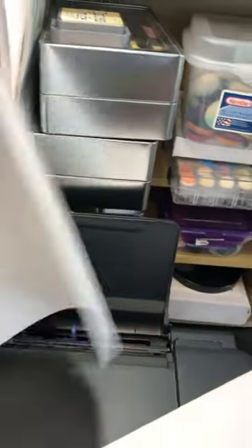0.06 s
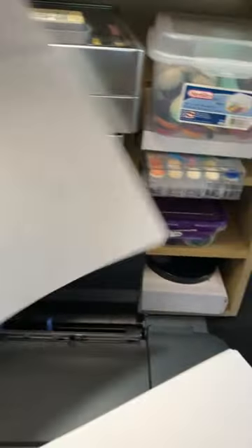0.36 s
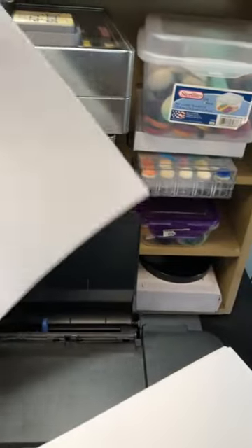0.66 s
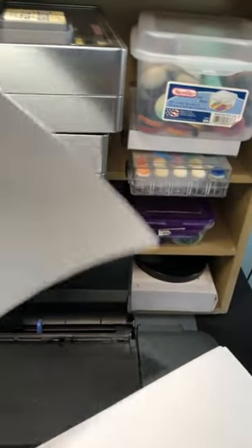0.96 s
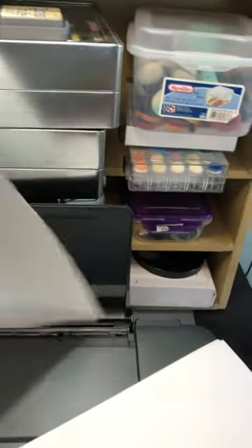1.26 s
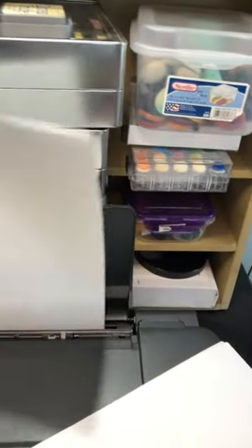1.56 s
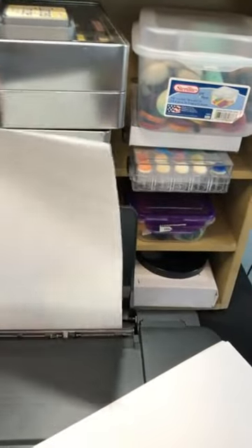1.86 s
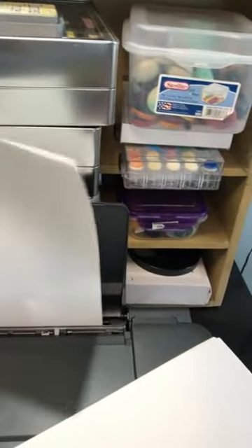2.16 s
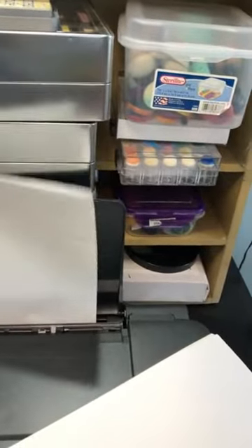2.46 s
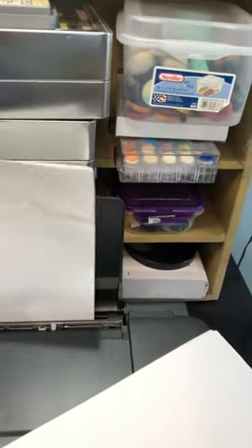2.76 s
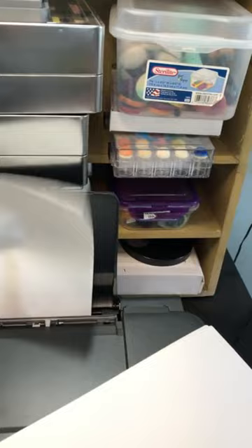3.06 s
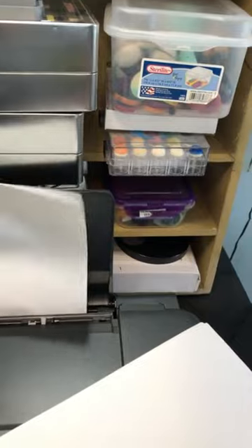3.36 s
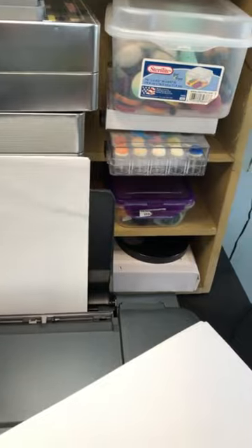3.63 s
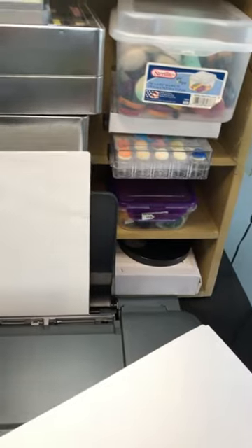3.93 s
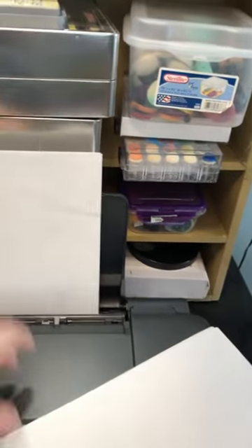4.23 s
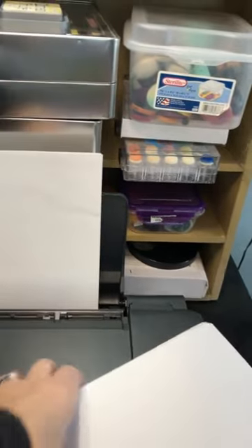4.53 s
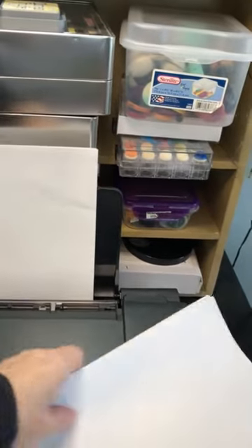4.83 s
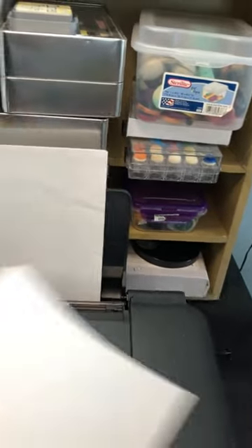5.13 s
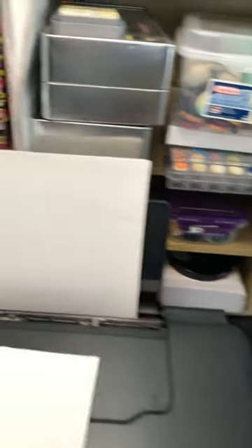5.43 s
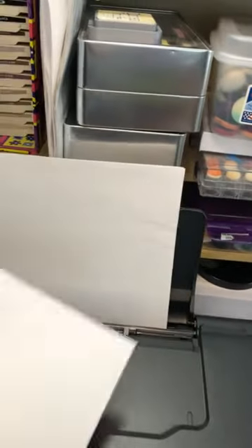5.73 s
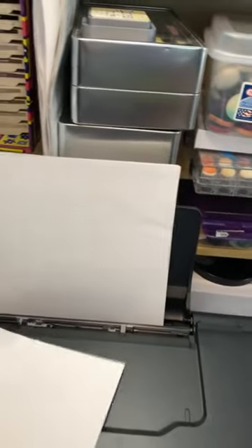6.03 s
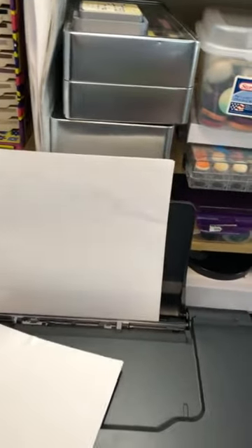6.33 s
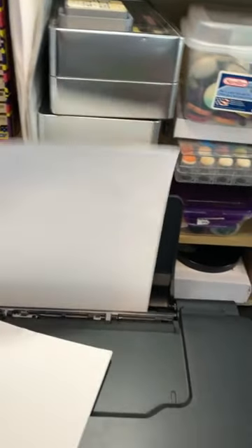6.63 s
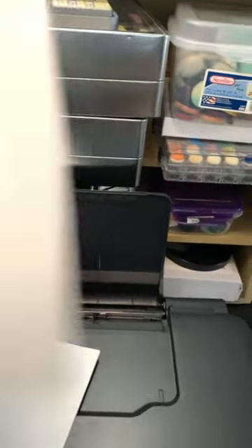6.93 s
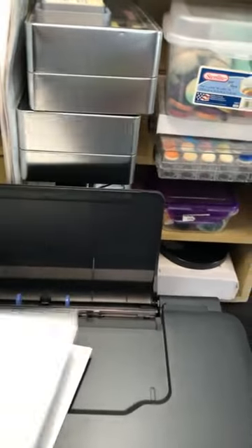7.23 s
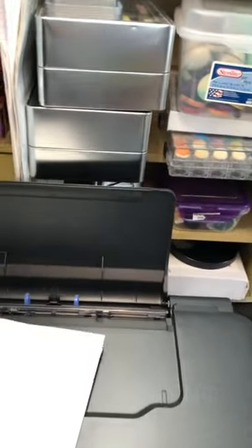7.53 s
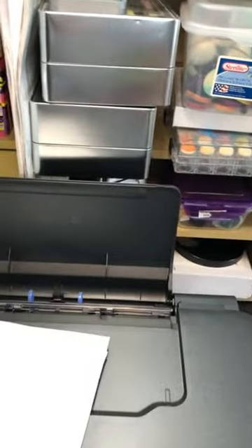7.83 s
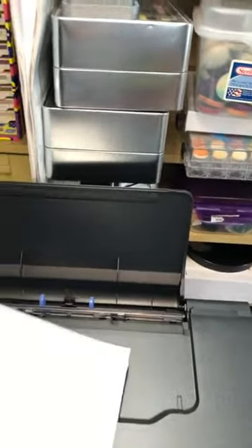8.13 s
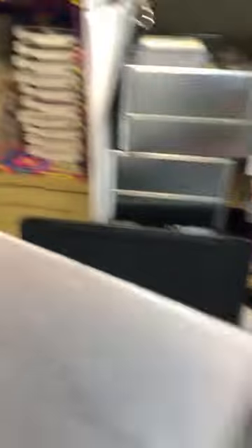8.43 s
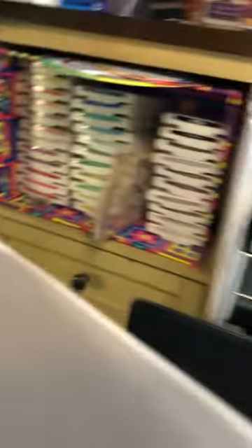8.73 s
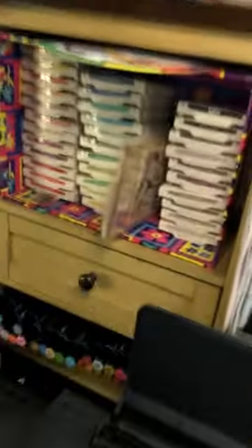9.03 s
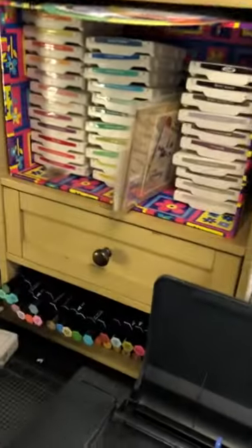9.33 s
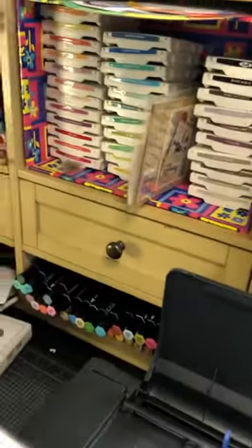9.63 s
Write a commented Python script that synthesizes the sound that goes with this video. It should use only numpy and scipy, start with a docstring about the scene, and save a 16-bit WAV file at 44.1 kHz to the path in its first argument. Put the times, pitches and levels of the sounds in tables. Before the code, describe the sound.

A sheet of paper flaps, rustles and buckles as its edges are tapped into a printer's plastic feed slot. A hand drags another sheet over the hollow lid, and paper swishes across paper. The first sheet is pulled out with a brief rough squeak. More snaps, scuffs and glides follow, ending with two drags and a soft handling rumble on the microphone. The sound is close, in a small room with a faint hum.

```python
"""Paper at the rear feed slot of an inkjet printer, close up in a small furnished room with a faint hum.
A sheet flaps, rustles and buckles, and its edges are tapped into the ringing plastic slot.
From 4.2 s a hand drags another sheet over the hollow lid, then paper swishes across paper.
At 6.6 s the first sheet is pulled out with a stick-slip squeak. More snaps, scuffs and glides follow,
and two last drags close the scene, with a soft rumble of the hand on the microphone."""
import sys
import numpy as np
from scipy import signal
from scipy.fft import rfft, irfft, next_fast_len
from scipy.io import wavfile
from scipy.ndimage import uniform_filter1d

SR = 44100
rng = np.random.default_rng(int(sys.argv[2]) if len(sys.argv) > 2 else 0)


def materialize(psi):
    """Save the field psi as 16-bit PCM at rate SR to the path in sys.argv[1].

    A 1-D psi becomes a single channel; in a 2-D psi each row is a channel.
    """
    bounded = np.clip(np.atleast_2d(psi).T, -1, 1)
    quanta = np.round(bounded * 32767).astype(np.int16)
    wavfile.write(sys.argv[1], SR, quanta)


N = 427329

# modes of the plastic feed tray: f/Hz, width/Hz, level/dB
TRAY_MODES = [(399, 530, -13.5), (1290, 260, 1), (1650, 100, -7.5), (2090, 160, -15), (3190, 330, -8),
              (4570, 1200, -4.5)]
CASE_HZ, CASE_WIDTH_HZ = 1530, 310   # the printer's hollow case sings along with rubbing


def from_db(db):
    """Decibels to gain."""
    return 10 ** (np.asarray(db) / 20)


def rms_one(x):
    """Scale to rms 1."""
    return x / np.sqrt(np.mean(x ** 2) + 1e-20)


def energy_one(x):
    """Scale to energy 1."""
    return x / np.sqrt(np.sum(x ** 2) + 1e-20)


def evened(x, size=1800):
    """Ride the level to rms 1 over `size` samples, keeping the grain."""
    return x / np.sqrt(uniform_filter1d(x ** 2, size) + 1e-9)


def envelope(points):
    """Gain at every sample from breakpoints of t/s, level/dB."""
    times, levels_db = np.transpose(points)
    return from_db(np.interp(np.arange(N) / SR, times, levels_db))


def drift(rate_hz):
    """Random wander with rms 1."""
    knots = rng.standard_normal(N // 20)
    return rms_one(np.interp(np.arange(N) / SR * rate_hz, np.arange(len(knots)), knots))


def band(x, low_hz, high_hz, order=2):
    """Causal band-pass."""
    top = min(high_hz, SR / 2 - 100)
    sos = signal.butter(order, [min(low_hz, top / 2), top], "band", fs=SR, output="sos")
    return signal.sosfilt(sos, x + 1e-18)


def resonator(hz, width_hz):
    """Filter coefficients of one resonance with gain 1 at its peak."""
    r = np.exp(-np.pi * width_hz / SR)
    return np.array([1, 0, -1]) * (1 - r * r) / 2, [1, -2 * r * np.cos(2 * np.pi * hz / SR), r * r]


def resonate(x, hz, width_hz):
    """Ring a fixed resonance."""
    return signal.lfilter(*resonator(hz, width_hz), x + 1e-18)


def sweep(x, hz, block=128):
    """Ring a moving resonance as wide as its centre frequency."""
    out, state = np.zeros(len(x)), np.zeros(2)
    for i in range(0, len(x), block):
        out[i:i + block], state = signal.lfilter(*resonator(hz[i], hz[i]), x[i:i + block], zi=state)
    return out


def colour(x, eq):
    """Shape a steady excitation with an EQ curve; rms 1."""
    size = next_fast_len(N)
    hz, db = np.transpose(eq)
    bins_hz = np.maximum(np.arange(size // 2 + 1) * SR / size, 1)
    gain = from_db(np.interp(np.log(bins_hz), np.log(hz), db, left=-60))
    return rms_one(irfft(rfft(x, size) * gain, size)[:N])


def grains(per_s, spread_db, smooth):
    """Tiny slips of uneven size on top of smooth friction noise."""
    sizes = from_db(spread_db * np.minimum(rng.exponential(1, N), 4)) * rng.choice([-1, 1], N)
    slips = rms_one(sizes * (rng.random(N) < per_s / SR))
    return slips + smooth * rng.standard_normal(N)


def tray(x, ring):
    """A contact heard directly and through the modes of the tray."""
    return x + ring * sum(from_db(db) * resonate(x, hz, width) for hz, width, db in TRAY_MODES)


def room_tone(noise_db=-66):
    """The bed: a faint, slightly wavering hum in dull room noise."""
    # hum tone: f/Hz, rms level/dB
    hum_tones = [(145.3, -72)]
    # EQ of the room noise: f/Hz, level/dB
    room_eq = [(25, -20), (65, 13), (150, 3), (550, 1), (1150, -8.5), (2200, -39), (4500, -21),
               (16000, -32)]
    t = np.arange(N) / SR
    hum = sum(np.sqrt(2) * from_db(db) * np.sin(2 * np.pi * hz * t + 0.49 * drift(42))
              for hz, db in hum_tones)
    return hum + from_db(noise_db) * colour(rng.standard_normal(N), room_eq)


def stroke_gains(fade_db=16, roundness=2.63, linger_s=0.032):
    """Each stroke swells and fades with the speed of the sheet: gains of friction, hiss and bending."""
    # sheet movements: fastest t/s, rise/s, fall/s, friction/dB, hiss/dB and bend/dB (both re friction)
    strokes = [(0.03, 0.1, 0.043, -59.5, -5.5, 2), (0.21, 0.17, 0.17, -53, -4, 8),
               (0.447, 0.055, 0.036, -48.5, -4.5, -4.5), (1.25, 0.11, 0.14, -61.5, 0.5, -17),
               (1.37, 0.054, 0.086, -48, -16, -2.5), (1.48, 0.079, 0.028, -57, -1.5, -16),
               (1.65, 0.057, 0.097, -57, -3.5, -22), (1.75, 0.017, 0.089, -40.5, -15, -6),
               (1.90, 0.19, 0.15, -59.5, -3, 4.5), (2.05, 0.061, 0.18, -53, -7, -9.5),
               (2.41, 0.25, 0.24, -49, -7.5, -5.5), (2.66, 0.04, 0.054, -49, -9.5, -2),
               (2.82, 0.067, 0.059, -49.5, -9.5, -6.5), (2.94, 0.078, 0.044, -51.5, -9, 1.5),
               (3.091, 0.076, 0.056, -50.5, -4, 1), (3.239, 0.054, 0.041, -42, -5.5, -3),
               (3.304, 0.014, 0.06, -46, -4, 0), (3.51, 0.087, 0.038, -54.5, -8, -1),
               (3.74, 0.11, 0.12, -57, -8, 2.5), (3.92, 0.22, 0.13, -66, 3, 5.5),
               (4.30, 0.067, 0.76, -49, -12.5, -5.5), (4.60, 0.059, 0.041, -42, -8.5, -9.5),
               (4.79, 0.1, 0.11, -58.5, 2, -6), (5.76, 0.045, 0.08, -54.5, -6.5, 0.5),
               (6.031, 0.22, 0.048, -60, 3.5, 4.5), (6.118, 0.0083, 0.023, -53, -23, 2),
               (6.441, 0.069, 0.18, -50.5, -7.5, 4.5), (6.64, 0.12, 0.18, -45.5, -13, 0),
               (7.05, 0.18, 0.22, -57.5, 0, -13), (7.36, 0.12, 0.078, -60, 8, 2),
               (7.66, 0.14, 0.21, -54.5, -11, -1), (7.66, 0.037, 0.015, -37, -13, -15),
               (8.089, 0.083, 0.086, -59.5, 6, -15), (8.82, 0.032, 0.1, -58.5, 13.5, -8),
               (9.04, 0.12, 0.15, -56.5, -9, 8), (9.34, 0.11, 0.061, -51.5, -4, 3.5),
               (9.587, 0.072, 0.13, -48.5, -3.5, -2.5)]
    t = np.arange(0, N + 32, 32) / SR
    power = from_db([[-72.5], [-80.5], [-68.5]]) ** 2   # a held sheet is never quite still

    def fade(peak, rise, fall):
        """Drop in dB either side of the fastest moment."""
        distance = np.maximum((peak - t) / rise, (t - peak) / fall)
        return fade_db * np.clip(distance, 0, 5) ** roundness

    for peak, rise, fall, friction_db, hiss_db, bend_db in strokes:
        rub_db = friction_db - fade(peak, rise, fall)
        wobble_db = friction_db - fade(peak, rise, fall + linger_s)   # the wobble outlasts the rub
        power = power + from_db([rub_db, rub_db + hiss_db, wobble_db + bend_db]) ** 2
    return [np.interp(np.arange(N) / SR, t, np.sqrt(p)) for p in power]


def rustle(friction, hiss, shift_db=16.0, catch_db=6.0, crackle_db=-9, crinkle_db=-11, case_db=-14):
    """Fibres catch and let go: coarse slips sound the tray and case, fine ones merge into soft hiss."""
    # EQ of the coarse rub: f/Hz, level/dB
    friction_eq = [(400, -13.5), (700, 3), (1400, 4), (2300, 0.5), (4200, -8.5), (6000, -13), (12000, -37)]
    # EQ of the fine hiss: f/Hz, level/dB
    hiss_eq = [(2000, -3), (3500, 0.5), (4800, -2), (8000, -6.5), (16000, -6)]
    slips = grains(2200, spread_db=4.0, smooth=0.93)
    # the resonances swell and fade as the bend of the sheet changes
    modes = sum(from_db(db + shift_db * drift(16)) * resonate(slips, hz, 2 * width)
                for hz, width, db in TRAY_MODES)
    coarse = from_db(catch_db * drift(70) - 2.05) * evened(colour(slips + 0.18 * modes, friction_eq))
    # each half octave of the hiss wanders on its own
    edges_hz = 2000 * 2 ** (np.arange(7) / 2)
    shimmer = sum(from_db(4.5 * drift(8.4)) * band(rng.standard_normal(N), low, high)
                  for low, high in zip(edges_hz, edges_hz[1:]))
    crackles = from_db(crackle_db) * grains(740, spread_db=8.0, smooth=0)
    fine = from_db(2.3 * drift(60)) * colour(evened(shimmer) + crackles, hiss_eq)
    case = resonate(rng.standard_normal(N), CASE_HZ, CASE_WIDTH_HZ)
    case = from_db(case_db) * rms_one(band(case, CASE_HZ / 2, 2 * CASE_HZ))
    # small creases ring low and round
    creases = grains(110, spread_db=1.2, smooth=0)
    crinkles = from_db(crinkle_db) * rms_one(band(tray(creases, ring=1.2), 640, 5600))
    return friction * (coarse + crinkles) + hiss * fine + np.hypot(friction, hiss) * case


def flexing(bend):
    """The sheet bends in many soft, low buckles."""
    # EQ of the buckling: f/Hz, level/dB
    flex_eq = [(30, -22.5), (95, -11.5), (160, 0), (330, 0.5), (650, -10.5), (1100, -42.5)]
    buckles = grains(700, spread_db=3.0, smooth=0.67)
    return bend * evened(colour(buckles, flex_eq), size=2000)


def scuffs():
    """A bowed sheet brushes past something: a swell of slips rings its hollow."""
    # hollow scuffs: middle t/s, level/dB, ring f/Hz, half length/s
    brushes = [(0.116, -45.5, 1210, 0.017), (0.163, -38, 264, 0.015), (0.248, -44.5, 960, 0.046),
               (0.307, -36.5, 270, 0.01), (5.003, -51, 1420, 0.044), (5.298, -48, 490, 0.017),
               (6.043, -45.5, 1460, 0.018), (6.949, -38, 380, 0.0027), (7.071, -45.5, 960, 0.0053),
               (7.151, -48, 2730, 0.0053), (7.413, -49, 1840, 0.011), (7.66, -37.5, 1320, 0.028),
               (7.836, -47, 860, 0.028), (8.033, -41.5, 650, 0.0025), (8.293, -41, 254, 0.0052),
               (8.888, -37.5, 630, 0.0085), (9.04, -48.5, 895, 0.044)]
    t, out = np.arange(N) / SR, np.zeros(N)
    slips = grains(1800, spread_db=1.5, smooth=1.0)
    for middle, level_db, ring_hz, half_s in brushes:
        near = np.abs(t - middle) < .5
        swell = 1 / np.cosh(np.minimum(np.abs(t[near] - middle) / half_s * np.pi / 2, 20))
        hollow = band(resonate(slips[near], ring_hz, 0.55 * ring_hz), ring_hz / 2, 2 * ring_hz)
        out[near] += from_db(level_db) * swell * evened(hollow, size=900)
    return out


def snap(ring_hz, contact_s, crack_db, thump_db, scrape_s=0.0011, thump_s=0.011):
    """A sudden contact with a short scrape: the paper rings, cracks on top, and the whole sheet thumps."""
    t = np.arange(SR // 8) / SR
    contact_s = max(contact_s, 1 / 4000)
    noise = rng.standard_normal((3, len(t)))
    scrape = energy_one(noise[0] * np.abs(noise[2]) * np.sqrt(t) * np.exp(-t / contact_s))
    # brief contacts are one clean click, long ones mostly a run of tiny slips
    contact = (t == 0) + contact_s / scrape_s * scrape
    # soft pops ring in a narrow band, crisp creases in a wide one
    body = resonate(tray(contact, ring=0.74), ring_hz, from_db(0.28 * crack_db) * ring_hz)
    note = 0.36 * resonate(body, ring_hz, ring_hz / 9)
    ring = energy_one(band(body + note, 0.33 * ring_hz, 2.0 * ring_hz, order=3))
    bright = contact + 2 * resonate(contact, 2.99 * ring_hz, 1300)
    crack = energy_one(band(bright, 2800, 23000))
    push = evened(noise[1], size=200) * np.sqrt(t) * np.exp(-t / thump_s)
    thump = energy_one(band(push, 165, 644))
    return ring + from_db(crack_db) * crack + from_db(thump_db) * thump


def snaps(lift_db=4.0):
    """Edges tap plastic and creases snap through; slow, low snaps move the sheet most and thump hardest."""
    # taps and snaps: t/s, level/dB before the lift, ring f/Hz, contact/s, crack/dB re level
    hits = [(0.189, -46.5, 2160, 0.0045, 1.5), (0.234, -46, 2240, 0.0072, -9),
            (0.35, -56, 1380, 0.0021, -4), (0.387, -50.5, 3530, 0.0023, -7),
            (0.416, -45.5, 4330, 0.0024, -16), (0.456, -48.5, 3050, 0.0019, -5),
            (0.59, -59.5, 2330, 0.0031, -7), (0.866, -73, 3030, 0.0014, -16), (1.055, -67, 4400, 0.01, -3),
            (1.113, -59, 1550, 0.0016, -10), (1.219, -55, 3100, 0.0022, -15),
            (1.251, -41.5, 1390, 0.0033, -3), (1.337, -46, 1090, 0.0067, -11),
            (1.392, -50, 2520, 0.0048, -5), (1.508, -44, 2760, 0.0018, 1), (1.698, -44, 1430, 0.00087, -74),
            (1.72, -40, 1810, 0.007, -0.5), (1.745, -42, 1940, 0.0013, 1.5),
            (1.794, -49.5, 3020, 0.00081, -5), (1.852, -46.5, 2220, 0.0039, -4.5),
            (2.173, -45.5, 2900, 0.0047, -4.5), (2.453, -38.5, 2070, 0.0021, -20.5),
            (2.631, -47, 1950, 0.0042, -22), (2.818, -44.5, 1660, 0.0017, -52),
            (2.862, -36, 1920, 0.0017, -25), (2.876, -47, 3400, 0.0016, -10),
            (3.091, -38.5, 1800, 0.0052, -40), (3.228, -39.5, 1540, 0.0026, -15),
            (3.287, -28, 2590, 0.0016, 0.5), (3.446, -51, 1550, 0.0039, -13),
            (3.496, -39.5, 1820, 0.0084, -17), (3.744, -47, 1850, 0.0045, -13),
            (3.827, -45, 3000, 0.00061, -38), (4.118, -62, 2220, 0.0088, -7),
            (4.228, -39, 1880, 0.0052, -7), (4.239, -40.5, 1160, 0.0069, -8),
            (4.424, -43.5, 2180, 0.0023, -8), (4.471, -45.5, 1440, 0.0023, -8.5),
            (4.525, -50.5, 1730, 0.0058, -4.5), (4.571, -47.5, 1564, 0.0064, -11),
            (4.703, -26.5, 1665, 0.00014, -56), (4.851, -54, 1320, 0.00057, -44.5),
            (5.667, -48, 830, 0.0018, -51), (5.77, -41, 1040, 0.0014, -61),
            (6.095, -54.5, 1670, 0.0041, -12), (6.423, -40.5, 2040, 0.0075, -11.5),
            (6.566, -45.5, 1720, 0.0074, -5), (6.587, -40.5, 2250, 0.012, -7.5),
            (6.686, -44.5, 2580, 0.0021, 4.5), (6.695, -43, 1050, 0.0011, -28),
            (6.922, -43, 2770, 0.0013, -7), (6.949, -50, 3180, 0.0006, 5.5),
            (6.970, -43, 2140, 0.00075, -31), (6.979, -44.5, 2670, 0.00067, -73),
            (7.264, -52.5, 1090, 0.0054, 0), (7.276, -36, 2470, 0.00082, -18),
            (7.279, -33, 3000, 0.00086, -14.5), (7.484, -55, 1230, 0.0032, -16),
            (8.063, -52, 1100, 0.0011, -0.5), (8.126, -49, 1840, 0.0021, -7.5),
            (8.506, -59, 3370, 0.0086, -7), (8.65, -53, 2020, 0.0074, -2.5), (8.721, -45.5, 2730, 0.005, 1),
            (8.745, -46.5, 2510, 0.0039, -6), (8.802, -39.5, 2730, 0.0018, -3.5),
            (8.869, -41.5, 830, 0.0011, -5), (8.934, -54.5, 1540, 0.001, 3.5),
            (8.951, -54, 1900, 0.0016, -6), (8.977, -59, 1500, 0.0016, 3), (9.265, -40, 1970, 0.0047, -9),
            (9.467, -53.5, 874, 0.0024, -12), (9.504, -52, 920, 0.0043, -30)]
    out = np.zeros(N + SR)
    for start, level_db, ring_hz, contact_s, crack_db in hits:
        thump_db = -0.5 - 9 * np.log2(ring_hz / 1500) + 3.5 * np.log2(contact_s / 0.0037)
        gain = np.sqrt(SR / 100) * from_db(level_db + lift_db)   # sets the ring's rms over 10 ms
        sound = gain * snap(ring_hz, contact_s, crack_db, thump_db)
        at = round(start * SR)
        out[at:at + len(sound)] += sound
    return out[:N]


def lid_drags(attack_s=0.0019, release_s=0.01, judder_db=4.5):
    """Pressed paper judders over the lid in dense small slips; lid and tray answer with a hollow ring."""
    # drags by hand: t/s, length/s, level/dB, ring f/Hz, easing/(dB per s; negative swells)
    drags = [(4.233, 0.42, -41.5, 637, 12), (8.862, 0.36, -45.5, 750, 30), (9.285, 0.91, -59, 410, -14)]
    # EQ of paper on the lid: f/Hz, level/dB
    lid_eq = [(300, -18.5), (450, -9), (630, 8.5), (900, 0.5), (1500, -16.5), (3400, -10.5), (6500, -22.5)]
    t, out = np.arange(N) / SR, np.zeros(N)
    judder = from_db(judder_db * drift(120)) * grains(1600, spread_db=1.2, smooth=0.6)
    slips = tray(judder, ring=1.3)
    for start, length, level_db, ring_hz, easing in drags:
        # the hand bites at once, eases off or leans in, then lets go
        gate = np.exp(-np.maximum(start - t, 0) / attack_s
                      - np.maximum(t - start - length, 0) / release_s)
        pressure = gate * from_db(level_db - easing * np.clip(t - start, 0, length))
        hollow = 0.83 * resonate(slips, ring_hz, width_hz=420)
        out += pressure * evened(colour(slips + hollow, lid_eq))
    return out


def glides(bend_db=-12, arch=0.98):
    """Sheet glides over sheet: a swish whose colour moves with the free length, over case ring and bend."""
    # swishes: start t/s, end t/s, level/dB, start f/Hz, end f/Hz, case ring/dB re level
    swishes = [(4.855, 5.143, -51.5, 4640, 5560, -22), (5.06, 5.314, -48.5, 5000, 2520, -8.5),
               (5.19, 5.565, -62, 3370, 4000, 0.5), (5.438, 5.707, -50, 4960, 2970, -21),
               (6.736, 6.872, -48, 4880, 7500, -22), (7.78, 8.087, -55, 3330, 3270, -10),
               (8.18, 8.458, -52, 3350, 3940, -19)]
    out = np.zeros(N + SR)
    slips = grains(900, spread_db=3.0, smooth=1.15)
    flutter = 2 ** (drift(24) / 5)   # the free end of the sheet sways
    for start, end, level_db, from_hz, to_hz, case_db in swishes:
        at = np.arange(int(start * SR), int(end * SR))
        t, rub = at / SR, slips[at]
        speed = np.abs(np.sin(np.pi * (t - start) / (end - start))) ** arch
        centre_hz = np.geomspace(from_hz, to_hz, len(at)) * flutter[at]
        swish = rms_one(sweep(tray(rub, ring=0.87), centre_hz))
        case = from_db(case_db) * rms_one(resonate(rub, CASE_HZ, CASE_WIDTH_HZ))
        bend = from_db(bend_db) * rms_one(band(rub, 170, 760))
        out[at] += from_db(level_db) * speed * (swish + case + bend)
    return out[:N]


def squeak(pitch_hz=2525, roughness=0.069, harmonic_step_db=-5.0):
    """Pulled from the slot, the paper edge sticks and slips almost regularly: a rough, harmonic squeak."""
    # envelope of the squeak: t/s, level/dB
    contour = [(6.616, -45), (6.625, -21), (6.630, -33), (6.637, -33), (6.660, -64)]
    t = np.arange(N) / SR
    phase = 2 * np.pi * np.cumsum(pitch_hz * (1 + roughness * drift(1500))) / SR
    tone = sum(from_db(harmonic_step_db * k) * np.sin((k + 1) * phase) for k in range(5))
    gate = (t > contour[0][0]) & (t < contour[-1][0])
    return gate * envelope(contour) * (rms_one(tone) + 0.53 * rng.standard_normal(N))


def hand_rumble():
    """The hand shifts on the microphone with a soft, low rumble."""
    # envelope of the rumble: t/s, level/dB
    contour = [(8.3, -89), (8.51, -57), (8.58, -87), (8.95, -52.5), (9.2, -69)]
    return envelope(contour) * rms_one(band(rng.standard_normal(N), 50, 140))


def reflections(early_db=-13, early_t60=0.023, tail_db=-14.5, body_t60=0.23, treble_t60=0.19):
    """Quick echoes from the printer and shelves, then a short tail that dulls as it dies."""
    t = np.arange(SR // 2) / SR
    noise = rng.standard_normal((3, len(t)))
    early = energy_one(noise[0] * (t > .002) * from_db(-60 * t / early_t60))
    body = band(noise[1], 220, 3600) * from_db(-60 * t / body_t60)
    treble = band(noise[2], 4900, 23000) * from_db(-2 - 60 * t / treble_t60)
    tail = energy_one((body + treble) * (t > .008))
    return from_db(early_db) * early + from_db(tail_db) * tail


def room(x, patterns=8):
    """Sheet and microphone keep moving, so one pattern of reflections crossfades into the next."""
    place = np.linspace(0, patterns - 1, N)
    sends = [np.sqrt(np.maximum(1 - np.abs(place - k), 0)) for k in range(patterns)]
    return x + sum(signal.oaconvolve(x * send, reflections())[:N] for send in sends)


def scene():
    """Paper in the room, the same in both channels."""
    friction, hiss, bend = stroke_gains()
    paper = rustle(friction, hiss) + flexing(bend) + scuffs() + snaps()
    paper += lid_drags() + glides() + squeak()
    return np.tile(room_tone() + room(paper) + hand_rumble(), (2, 1))


def record(dry, cutoff_hz=15900):
    """A steep low-pass takes off the very top."""
    return signal.sosfilt(signal.ellip(10, .2, 80, cutoff_hz, fs=SR, output="sos"), dry)


dry = scene()
out = record(dry)
materialize(out)
```